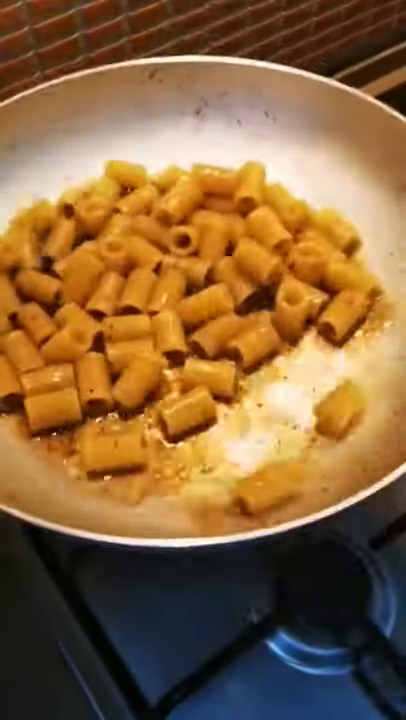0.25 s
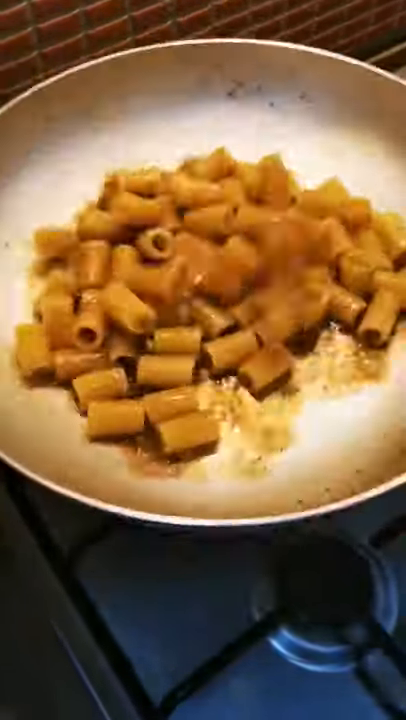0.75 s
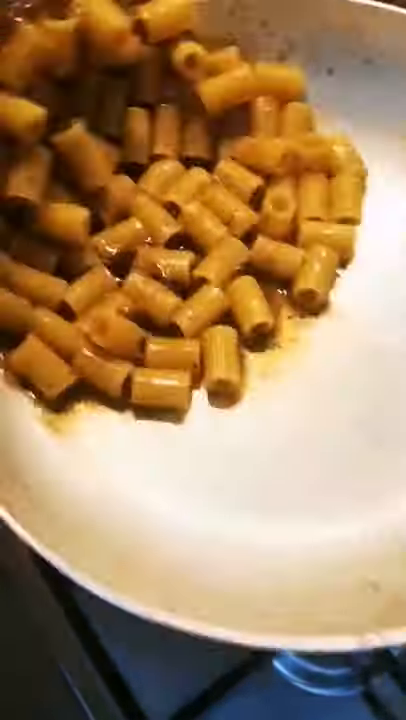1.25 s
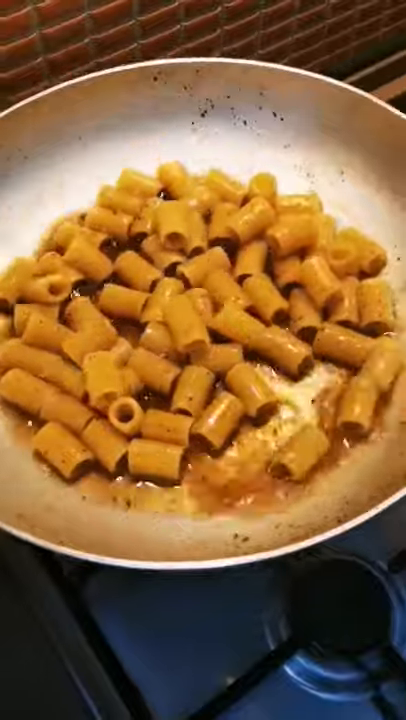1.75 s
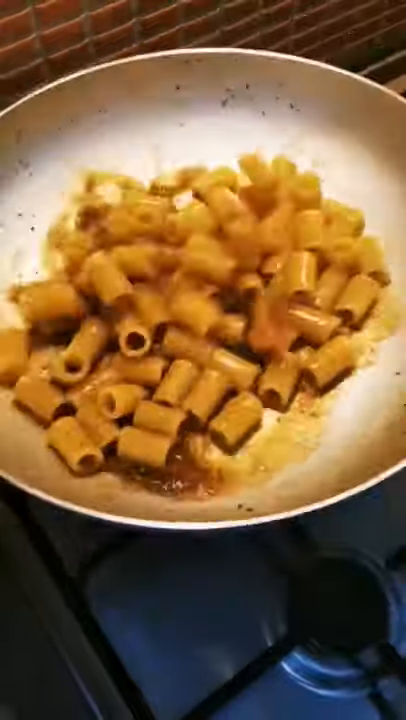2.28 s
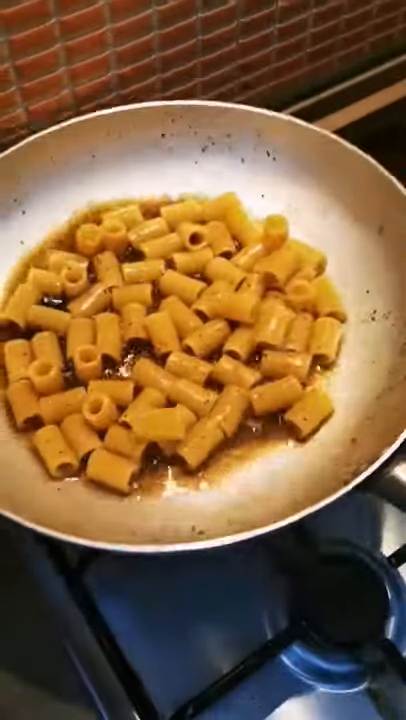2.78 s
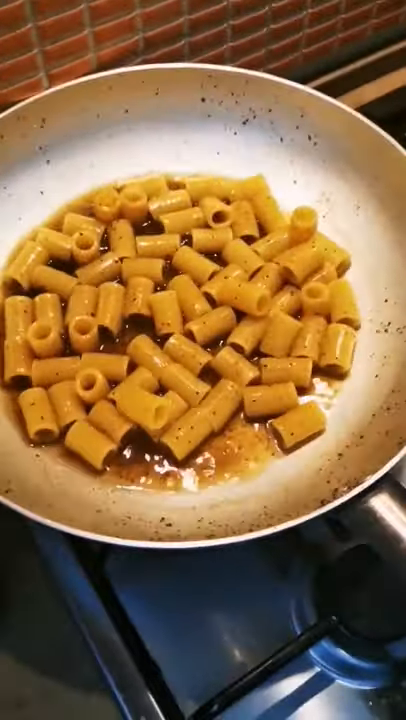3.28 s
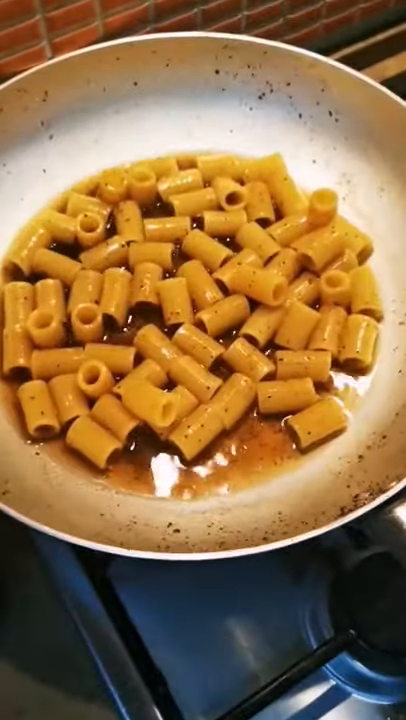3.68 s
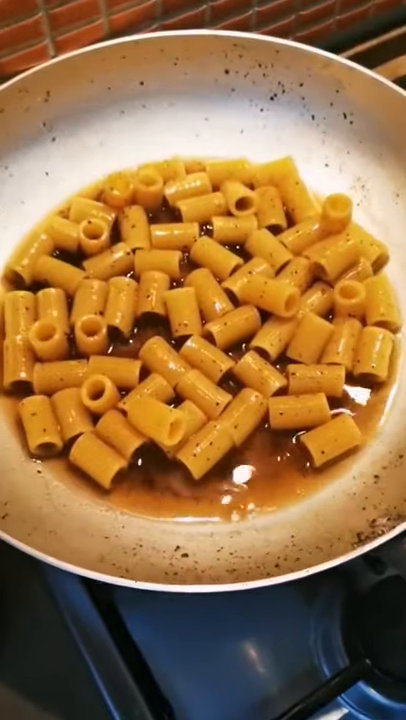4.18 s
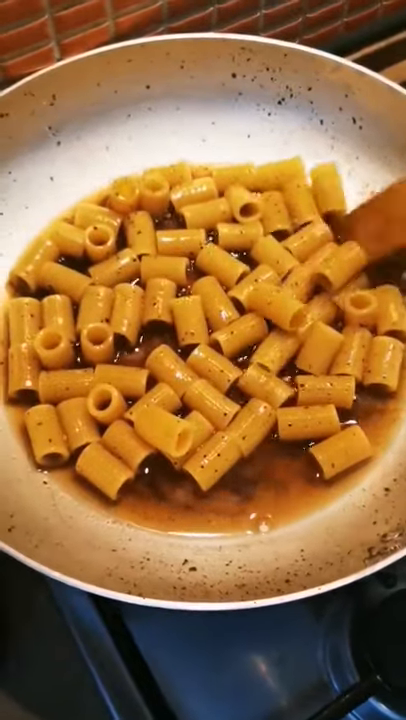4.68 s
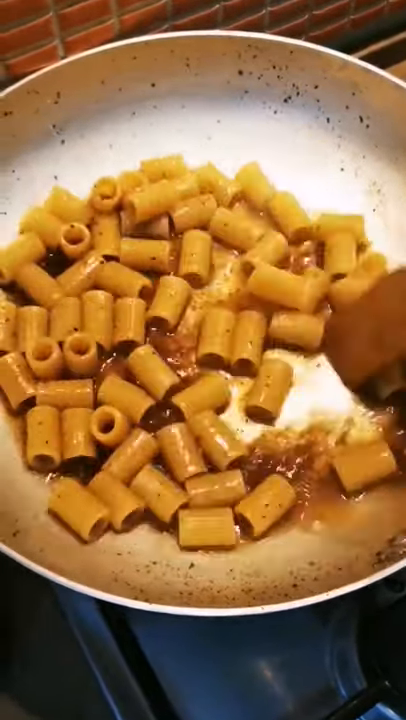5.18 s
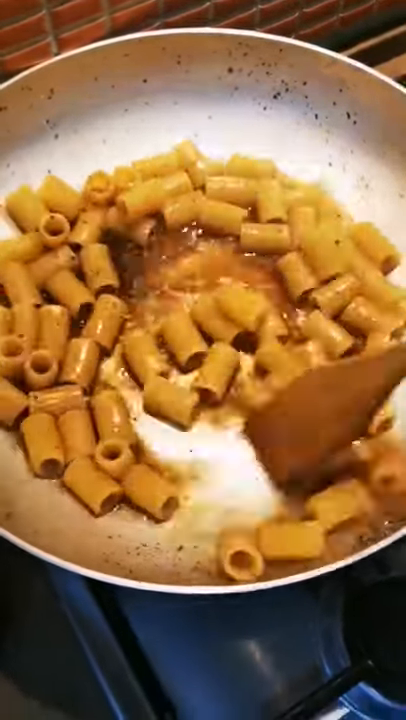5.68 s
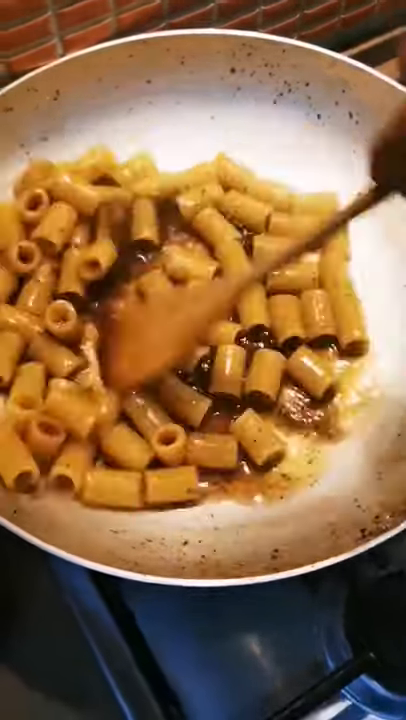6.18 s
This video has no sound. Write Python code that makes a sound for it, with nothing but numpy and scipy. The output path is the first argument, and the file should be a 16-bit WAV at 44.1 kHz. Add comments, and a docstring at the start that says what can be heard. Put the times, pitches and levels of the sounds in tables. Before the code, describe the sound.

Over a faint gas hiss, pasta lands in wet showers, the pan clangs down and rattles, and a wooden spatula knocks and squelches.

```python
"""Small tiled kitchen, a hand-held phone close to a pan of wet tube pasta over a lit gas hob.
The pan is tossed four times: pasta lands in showers of wet ticks, single tubes plop, and the hand
shifts on the phone. At 3 s the pan clangs down on the iron grate and judders along it. From 4.4 s
a wooden spatula rubs and knocks on the base, and the sauce squelches under it.
The burner hisses throughout, over a low room rumble."""
import sys
import numpy as np
from scipy import signal
from scipy.fft import rfft, irfft
from scipy.io import wavfile
from scipy.ndimage import uniform_filter1d

SR = 44100
rng = np.random.default_rng(int(sys.argv[2]) if len(sys.argv) > 2 else 0)


def generate_wav(sig):
    """Save sig (samples, or channels by samples) to the path in sys.argv[1] as 16-bit PCM at SR."""
    pcm = np.round(np.clip(np.atleast_2d(sig).T, -1, 1) * 32767).astype(np.int16)
    wavfile.write(sys.argv[1], SR, pcm)


N = 283997

# The hob's low modes, booming under the pan. Each row: pitch in Hz, relative level in dB, t60 in seconds.
HOB_MODES = [(58.2, -11.5, 0.86), (87, -8, 0.23), (129, 0, 0.39), (160, 0, 0.19), (198, -2.5, 0.16),
             (288.5, -6, 0.69)]


def tossed_pasta():
    """Wet ticks of pasta on pasta, soft slaps on the base, the spit of tearing sauce films; stereo."""
    # Each row: first tubes land in seconds, wait for the heap and length of its pour in seconds,
    # then relative levels of ticks, spit and slaps in dB.
    tosses = [(.155, .11, 0.068, -36, -41, -46.5), (.93, 0.077, 0.062, -36, -41, -46.5),
              (1.662, 0.08, 0.038, -35.5, -38, -49.5), (2.421, 0.11, 0.038, -34.5, -37, -41.5)]
    # Colour of the ticks. Each row: frequency in Hz, relative spectral level in dB.
    tick_spectrum = [(1000, -57), (1500, -6), (2200, 5), (3500, 0), (6500, 5), (7800, -1), (9000, -0.5)]
    early_db, settle_db = -12.5, -18  # first tubes and settling tubes, against the heap
    rise_db_s, fall_db_s = 268, 404
    tick_gain = spit_gain = slap_gain = 0
    for start, wait, pour, tick_db, spit_db, slap_db in tosses:
        lands = start + wait
        early = swell(start, wait, early_db, rise_db_s=1200, fall_db_s=fall_db_s)
        heap = swell(lands, pour, 0, rise_db_s, fall_db_s)
        settling = swell(lands + pour, 0, settle_db, rise_db_s, fall_db_s=59)
        tick_gain += undb(tick_db) * (early + heap + settling)
        # the spit grows until halfway through the pour; the slaps are the heap's first contact
        begun = np.arange(N) > start * SR
        spit_gain += begun * swell(lands + pour / 2, pour / 2, spit_db, 149, fall_db_s)
        slap_gain += swell(lands, 0.0051, slap_db, rise_db_s=404, fall_db_s=209)
    shared = grains(6000, spread_db=4.0)
    lumps = undb(2.02 * walk(86))
    # the small sources lie all over the pan, so each microphone hears its own mix of them
    crackle = np.array([0.13 * shared + grains(6000, spread_db=3.0) for _ in range(2)])
    # tubes of every length smack now and then, each at its own pitch
    smacks = sum(ring(grains(60, spread_db=3.1), hz, t60=.012) for hz in np.geomspace(1500, 6000, 7))
    ticks = np.array([colour(side, tick_spectrum) for side in crackle]) + 0.16 * unit(smacks)
    spit = unit(band(crackle, 7830, 10960)) * undb(1.8 * walk(75))
    slaps = unit(band(grains(800, spread_db=-1.0), 510, 2250))
    showers = lumps * (tick_gain * ticks + spit_gain * spit + slap_gain * slaps)
    return showers, crackle, spit  # the stirred sauce uses the same wet textures


def sauce_squelches(crackle, spit):
    """Sauce squeezed under the spatula: uneven swells of wet crackle with a little spit on top."""
    # Each row: crest time in seconds, relative level in dB.
    squelches = [(5.14, -54), (5.741, -68), (5.85, -85), (6.01, -55.5), (6.33, -57), (6.43, -64)]
    gain = sum(swell(crest, 0, db, rise_db_s=104, fall_db_s=104) for crest, db in squelches)
    return gain * undb(4.4 * walk(56)) * (unit(band(crackle, 1130, 3670)) + .4 * spit)


def tube_plops():
    """Each tube rings briefly at its air column, rough with sauce, and throws a short splash."""
    # Each row: start in seconds, relative level in dB, starting pitch in Hz, splash offset in dB.
    plops = [(0.162, -30, 4260, 7.5), (0.1922, -32, 3580, 6.5), (0.2373, -22, 3450, 3),
             (0.2874, -42, 1060, 9), (0.322, -37.5, 3100, 14), (0.946, -35, 2100, -5),
             (0.9552, -25.5, 2770, -1), (1.007, -41, 1120, 24), (1.064, -35.5, 4050, 18.5),
             (1.212, -31.5, 2530, -7), (1.6644, -37.5, 2310, -10), (1.866, -41.5, 2000, 4),
             (2.424, -23, 3175, -9), (2.434, -42.5, 1070, 13), (2.512, -22.5, 1950, 10),
             (2.5363, -30, 1140, -6), (5.017, -36, 3240, 5.5), (5.092, -30.5, 1900, 1),
             (5.1344, -39.5, 4360, 4), (5.2074, -52.5, 2700, 24.5), (5.307, -39.5, 2660, 4),
             (5.7334, -42.5, 4160, 6), (5.8402, -45, 2600, 10), (5.9948, -38.5, 2210, 9),
             (6.3007, -51, 2960, 18), (6.346, -44, 2350, 7), (6.4083, -47, 1550, 16.5)]
    attack_s, t60_s, rough_hz = 0.0014, .021, 2300
    out, t = np.zeros(N), np.arange(SR // 10) / SR
    envelope = (1 - np.exp(-t / attack_s)) ** 2 * np.exp(-np.log(1000) * t / t60_s)
    for start, db, hz, splash_db in plops:
        rough_noise, splash_noise = rng.standard_normal((2, len(t)))
        tone = np.sin(2 * np.pi * hz * (t + 2.1 * t ** 2))  # pitch climbs as the cavity empties
        rough = unit(band(rough_noise, hz - 450, hz + 800)) * rough_hz / hz  # low plops are sloppiest
        splash = undb(splash_db) * unit(band(splash_noise, 4500, 11500))
        add(out, start, envelope * undb(db) * (2.2 * (tone + rough) + 0.88 * splash))
    return out


def pan_clangs():
    """Aluminium on the iron grate: a crack, the pan's modes (deadened by pasta) and the hob's boom."""
    # Each row: time in seconds, relative level in dB, boom offset in dB, hardness from 0 to 1.
    clangs = [(3.054, -4.5, -22, 0.98), (3.106, -16.5, -11, 0.3), (3.127, -24, -1.5, 0.9),
              (3.189, -18, -12.5, 0.45), (3.241, -30, -22, 0.76), (3.439, -22.5, -9, 0.37)]
    # The loaded pan's modes. Each row: pitch in Hz, relative level in dB, t60 in seconds.
    pan_modes = [(627, -6.5, 0.081), (1077, -3.5, 0.044), (1780, -23, 0.08), (1880, 12, 0.023),
                 (2420, -19, 0.037), (2610, 5, 0.078), (2950, -20, 0.083), (3650, 8, 0.02),
                 (4660, -10, 0.16), (4610, -2.5, 0.1), (5250, -30, .06), (6300, -21, .04)]
    out, t = np.zeros(N), np.arange(SR // 2) / SR
    click = 1. * (t == 0)
    for start, db, boom_db, hardness in clangs:
        chance = rng.standard_normal(len(t))
        crack_envelope = 0.6 * hardness * np.exp(-t / 0.0026) + 0.1 * np.exp(-t / 0.011)
        crack = crack_envelope * unit(band(chance, 610, 6850))
        snap = 1.6 * hardness * ring(click, hz=2650, t60=0.0063)
        pan = 0.59 * blow(pan_modes, chance, push_s=.0001)
        boom = undb(boom_db) * blow(HOB_MODES, chance[-len(HOB_MODES):], push_s=0.0028)
        add(out, start + 0.00074, undb(db) * (crack + snap + pan + boom))
    return out


def pan_slides():
    """Stick-slip judder drives the grate's resonances and the hob's boom, with a gritty hiss on top."""
    # Each row: start and length in seconds, levels of rasp, rumble and hiss in dB,
    # ringing share from 0 to 1, fall of rasp and rumble in dB per second.
    slides = [(3.055, 0.063, -38, -34, -34, 0.2, 71), (3.446, 0.041, -41.5, -37.5, -94, 0.91, 182),
              (3.514, 0.037, -39.5, -45, -45.5, 0.99, 294)]
    # The iron grate's resonances. Each row: pitch in Hz, bandwidth in Hz, relative level in dB.
    grate_modes = [(690, 60, -2.5), (958, 24, -7.5), (1108, 31, 2), (1550, 910, -7.5), (2422, 47, -6.5),
                   (3040, 160, -26), (3930, 18, -10), (5260, 59, -27)]
    rise_db_s, rumble_lingers_s = 907, 0.029
    judder = grains(2500, spread_db=-1.0)
    grate = unit(sum(undb(db) * unit(ring(judder, hz, t60=np.log(1000) / np.pi / width))
                     for hz, width, db in grate_modes))
    scratch = unit(band(judder, 470, 2850))
    rumble = unit(band(rubbed(HOB_MODES, judder, t60_scale=0.53), 33, 530))
    hiss = unit(band(noise(), 3700, 10200))
    out = np.zeros(N)
    for start, length, rasp_db, rumble_db, hiss_db, ringing, fall_db_s in slides:
        rasp = ringing * grate + np.sqrt(1 - ringing ** 2) * scratch
        out += rasp * swell(start, length, rasp_db, rise_db_s, fall_db_s)
        out += rumble * swell(start, length + rumble_lingers_s, rumble_db, rise_db_s, fall_db_s)
        out += hiss * swell(start, length, hiss_db, rise_db_s, 2.34 * fall_db_s)
    return out


def spatula():
    """Knocks and rubs sound through the wood's modes; the drag after a knock sets the base humming."""
    # Each row: start in seconds, level in dB, contact time in seconds, chatter and hum levels in dB.
    knocks = [(4.933, -20, 0.0002, -37, -47), (6.181, -32.5, 0.0022, -57.5, -46)]
    # The edge rubbing the base. Each row: start in seconds, length in seconds, level in dB.
    rubs = [(4.443, 0.26, -61), (4.998, .04, -56), (6.207, 0.06, -57.5)]
    # The wood's modes when struck. Each row: pitch in Hz, relative level in dB, t60 in seconds.
    wood_modes = [(573, 3, 0.11), (662, 8, 0.039), (764, 5.5, 0.03), (1040, 13, 0.0057), (1765, 4.5, 0.031),
                  (2100, 3.5, 0.012)]
    boom_db, hum_lag_s = -18, 0.07  # both against the knock
    out, hum_gain = np.zeros(N), 0
    rub_gain = sum(swell(start, length, db, rise_db_s=99, fall_db_s=36) for start, length, db in rubs)
    for start, db, contact_s, chatter_db, hum_db in knocks:
        chance = rng.standard_normal(len(wood_modes))
        boom = undb(boom_db) * blow(HOB_MODES, chance, push_s=0.0025)
        add(out, start, undb(db) * (blow(wood_modes, chance, contact_s) + boom))
        rub_gain += swell(start + 0.0068, 0, chatter_db, rise_db_s=3000, fall_db_s=376)
        hum_gain += swell(start + hum_lag_s, 0, hum_db, rise_db_s=235, fall_db_s=208)
    judder = grains(2000, spread_db=0.0)
    rub = unit(rubbed(wood_modes, judder, t60_scale=1.57))
    hum = unit(ring(judder, hz=194.7, t60=0.27))
    return out + rub_gain * rub + hum_gain * hum


def burner_hiss():
    """The gas flame hisses under the pan, flickering band by band."""
    # Colour of the flame. Each row: frequency in Hz, relative spectral level in dB.
    flame_spectrum = [(300, -16.5), (600, -7), (950, -12.5), (1350, -5), (2400, -17), (3500, -9), (3930, 1),
                      (4230, -4.5), (4500, 1.5), (4750, -4), (5050, 0), (5400, -9), (6900, -9),
                      (8800, -8.5), (10200, -2.5), (11200, -11.5), (12000, -11.5)]
    # Its slow drift. Each row: time in seconds, level in dB.
    flame_levels = [(0, -50), (2.9, -50.5), (3.8, -53), (5.5, -50.5), (6.44, -51)]
    flame = ambient_spectra(flame_spectrum)
    octave = np.log2(np.arange(N // 2 + 1) * SR / N + 1)
    hiss = 0
    for centre in np.arange(8, 14.1, .75):  # overlapping bands, in octaves above 1 Hz
        weight = np.clip(1 - abs(octave - centre) / 0.64, 0, 1)
        hiss += undb(1.72 * walk(28)) * irfft(flame * weight, N)
    return undb(over_time(flame_levels)) * unit(hiss)


def kitchen_rumble():
    """Room tone: a low rumble whose level wavers."""
    # Colour of the rumble. Each row: frequency in Hz, relative spectral level in dB.
    rumble_spectrum = [(20, -11), (45, -14), (70, -13), (120, -3), (200, -13.5), (290, -17.5), (400, -22.5),
                       (600, -28)]
    # The course it wavers around. Each row: time in seconds, level in dB.
    rumble_levels = [(0, -53.5), (2.98, -54), (3.26, -56), (3.39, -59), (3.82, -57), (4.68, -62),
                     (5.07, -56.5), (5.6, -60), (6.44, -62)]
    gain = undb(over_time(rumble_levels) + 2.46 * walk(6.4))
    return gain * unit(irfft(ambient_spectra(rumble_spectrum), N))


def handling_noise():
    """Deep thuds carried through the phone's case as the hand shifts with the swing of the pan."""
    # Each row: crest time in seconds, level in dB.
    shifts = [(.75, -61.5), (1.45, -52.5), (2.05, -59.5)]
    grip_db = -62.5  # steady floor between the shifts
    thuds = sum(swell(crest, 0, db, rise_db_s=58.5, fall_db_s=58.5) for crest, db in shifts)
    return (undb(grip_db) + thuds) * unit(band(noise(), 22.7, 52.2))


def tile_echoes(x, t60_s=0.42, level_db=-15.5):
    """Tiled walls return a different decaying scatter to each microphone, with little bass in it."""
    t = np.arange(SR // 2) / SR
    decay = np.exp(-np.log(1000) * t / t60_s) * (t > .002)
    echoes = band(rng.standard_normal((2, len(t))) * decay, 250, 7500)
    echoes /= np.sqrt(np.sum(echoes ** 2, axis=1, keepdims=True))
    return undb(level_db) * signal.fftconvolve(x, echoes, axes=1)[:, :N]


def ambient_spectra(spectrum):
    """Left and right spectra of coloured noise; only the low end is alike at both microphones."""
    # Each row: frequency in Hz, left-right correlation.
    likeness = [(60, 0.7), (130, 1), (270, 0.84), (580, 0.66), (1250, 0), (12000, 0.18)]
    alike = np.clip(across(likeness), -.95, .99)
    mid = rfft(noise()) * np.sqrt(1 + alike)
    side = rfft(noise()) * np.sqrt(1 - alike)
    return np.array([mid + side, mid - side]) * undb(across(spectrum))


def widen_treble(x):
    """Treble sounds wide and diffuse between left and right, while the bass stays centred."""
    uneven = smooth(rng.standard_normal(N // 2 + 1), width=2000)
    phase = across([(400, 0), (1500, 1)]) * (np.pi / 4 + .15 * uneven)
    return irfft(rfft(x) * np.exp(1j * phase * np.array([[1], [-1]])), N)


def mic_colour(x, share):
    """The two microphones differ in colour; a close source takes a larger share of the tilt."""
    # Each row: frequency in Hz, tilt towards the left in dB before the share is applied.
    mic_tilt = [(60, -3), (300, 4), (630, 11), (1100, 3), (2500, 5.5), (4000, 1.5), (7000, -2.5),
                (8200, 4.5), (9000, 19), (11300, 20.5)]
    tilt_db = share * across(mic_tilt) * np.array([[1], [-1]])
    return irfft(rfft(x) * np.sqrt(2 / (1 + undb(-2 * tilt_db))), N)


def blow(modes, chance, push_s):
    """One hit: a smooth push into the modes, each excited a little differently by chance; peak 1."""
    push = np.zeros(SR // 2)
    width = max(int(push_s * SR), 3)
    push[:width] = np.hanning(width)
    # neighbouring modes move in opposite senses, so little radiates below the lowest
    x = sum((-1) ** n * undb(db + 3.6 * chance[n]) * ring(push, hz, t60)
            for n, (hz, db, t60) in enumerate(modes))
    x = band(x, .8 * modes[0][0], 11000)
    return x / np.abs(x).max()


def rubbed(modes, judder, t60_scale):
    """Modes kept ringing by friction, their decay times scaled."""
    return sum(undb(db) * unit(ring(judder, hz, t60_scale * t60)) for hz, db, t60 in modes)


def ring(x, hz, t60):
    """One mode; a unit click rings with a peak near 1."""
    pole = np.exp(2j * np.pi * hz / SR - np.log(1000) / (t60 * SR))
    return signal.lfilter([1], [1, -pole], x).imag


def grains(rate, spread_db):
    """Random clicks of uneven size, about rate a second; rms 1."""
    hit = rng.random(N) < rate / SR
    size = np.minimum(rng.exponential(1, N), 3)
    return unit(hit * undb(spread_db * size) * noise())


def swell(at_s, hold_s, db, rise_db_s, fall_db_s):
    """Gain that climbs to db at at_s, holds, then falls; both slopes straight in dB."""
    t = np.arange(N) / SR - at_s
    return undb(db - rise_db_s * np.maximum(-t, 0) - fall_db_s * np.maximum(t - hold_s, 0))


def walk(rate_hz):
    """Slow random wander, rms 1."""
    return smooth(noise(), int(SR / rate_hz))


def smooth(x, width):
    """Two running means, then rms 1."""
    return unit(uniform_filter1d(uniform_filter1d(x, width), width))


def over_time(table):
    """A (seconds, value) table read at every sample."""
    return np.interp(np.arange(N) / SR, *np.transpose(table))


def across(table):
    """A (Hz, value) table read at every bin, straight on a log axis."""
    hz, value = np.transpose(table)
    return np.interp(np.log(np.arange(N // 2 + 1) * SR / N + 1), np.log(hz), value)


def colour(x, table):
    """Give x a (Hz, dB) spectrum, rms 1."""
    return unit(irfft(rfft(x) * undb(across(table)), N))


def band(x, lo_hz, hi_hz):
    return signal.sosfilt(signal.butter(2, [lo_hz, hi_hz], "bandpass", fs=SR, output="sos"), x)


def add(out, start_s, x):
    i = int(start_s * SR)
    out[i:i + len(x)] += x[:len(out) - i]


def undb(db):
    return 10 ** (np.asarray(db) / 20)


def unit(x):
    return x / np.sqrt(np.mean(x ** 2))


def noise():
    return rng.standard_normal(N)


def scene():
    """The pan close up with its echoes, burner and room behind, the hand on the phone itself."""
    contacts = widen_treble(tube_plops() + pan_clangs() + pan_slides() + spatula())
    showers, crackle, spit = tossed_pasta()
    near = contacts + showers + sauce_squelches(crackle, spit)
    foreground = mic_colour(near + tile_echoes(near), share=0.85)
    background = mic_colour(burner_hiss() + kitchen_rumble(), share=0.48)
    return foreground + background + handling_noise()


def record(dry):
    """The phone rounds off the loudest peaks and cuts the top steeply."""
    ceiling, top_hz = .85, 11500
    lowpass = signal.ellip(10, .2, 80, top_hz, fs=SR, output="sos")
    return signal.sosfilt(lowpass, ceiling * np.tanh(dry / ceiling))


dry = scene()
out = record(dry)
generate_wav(out)
```